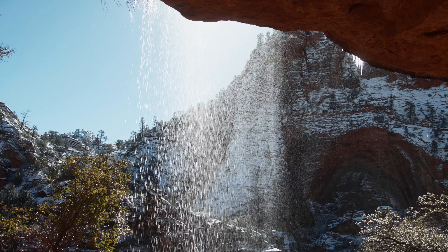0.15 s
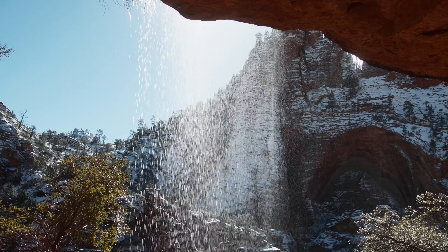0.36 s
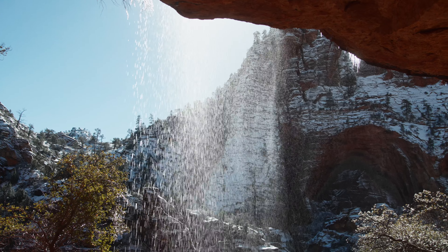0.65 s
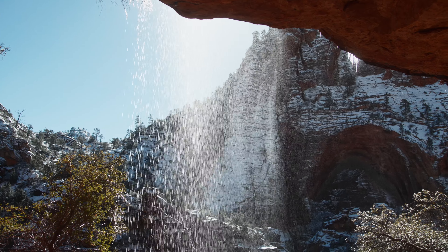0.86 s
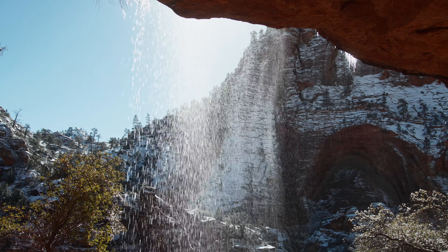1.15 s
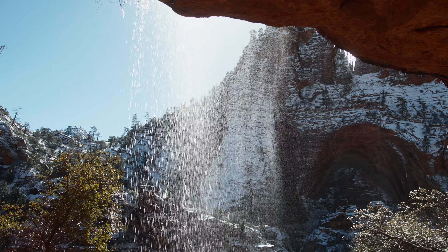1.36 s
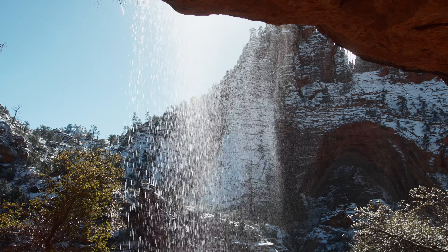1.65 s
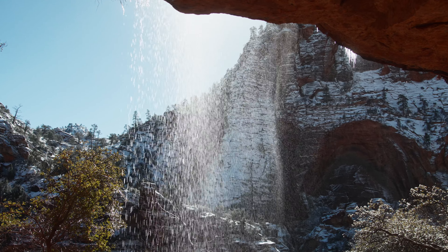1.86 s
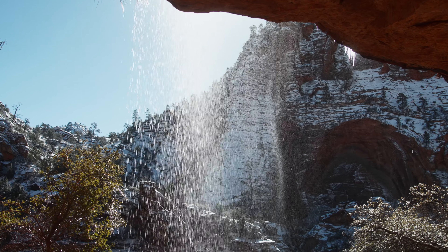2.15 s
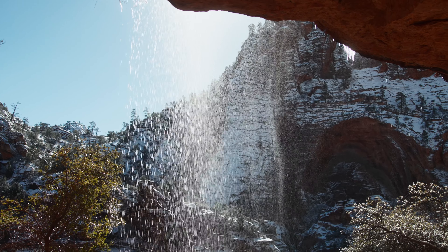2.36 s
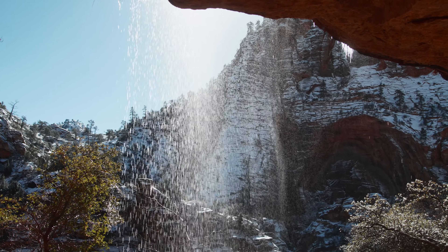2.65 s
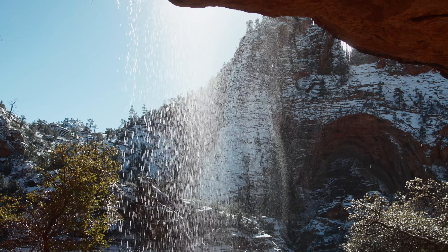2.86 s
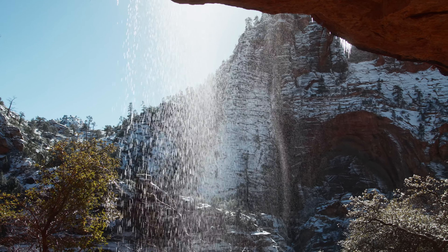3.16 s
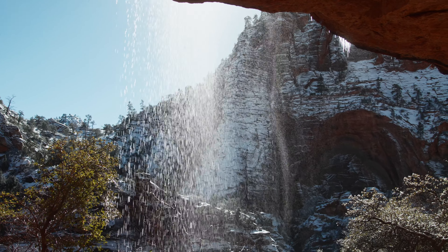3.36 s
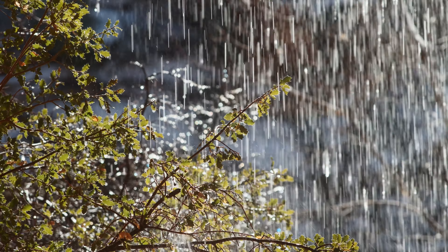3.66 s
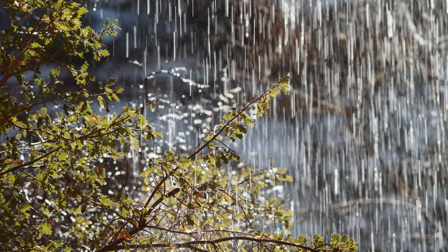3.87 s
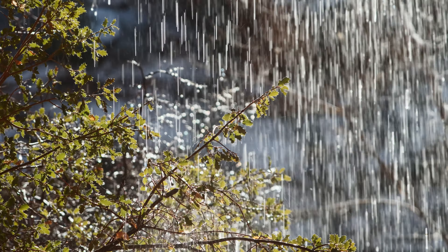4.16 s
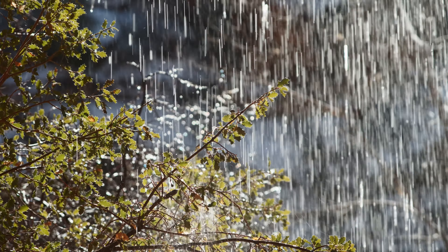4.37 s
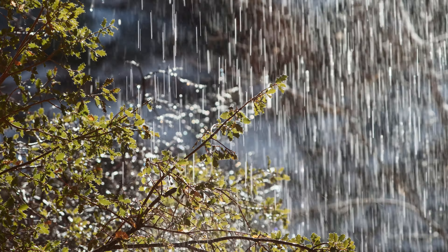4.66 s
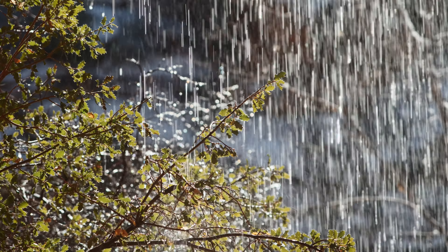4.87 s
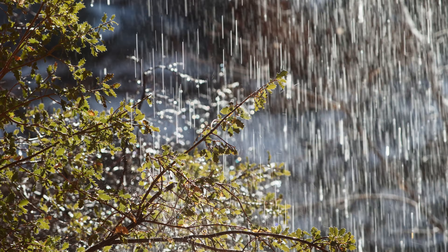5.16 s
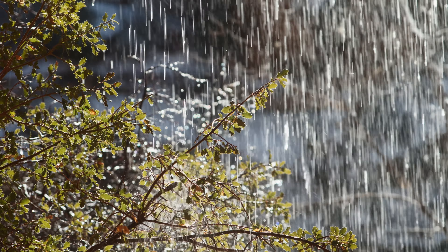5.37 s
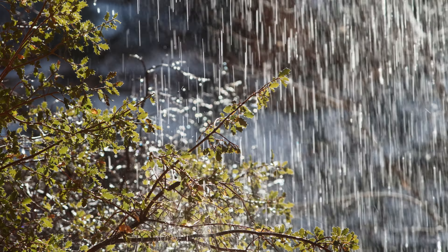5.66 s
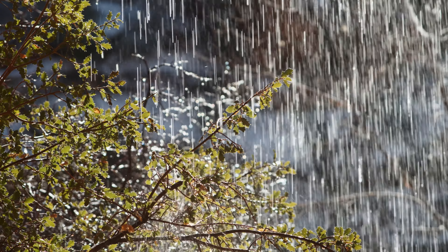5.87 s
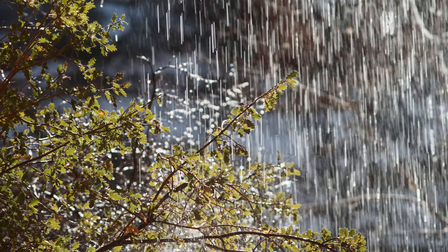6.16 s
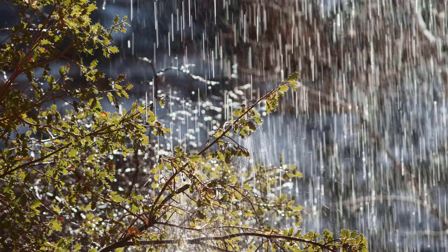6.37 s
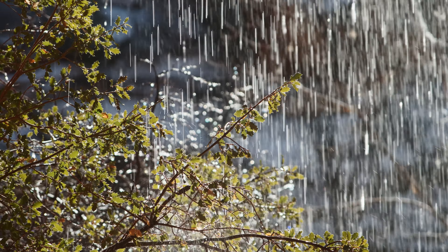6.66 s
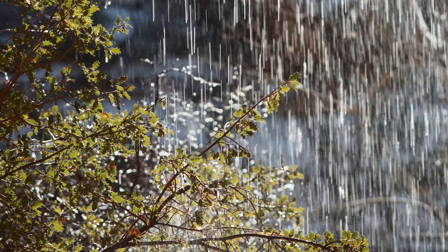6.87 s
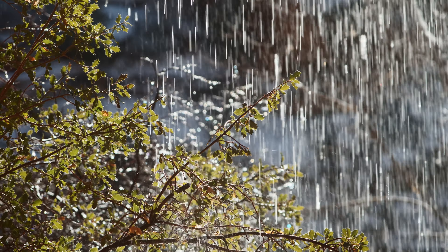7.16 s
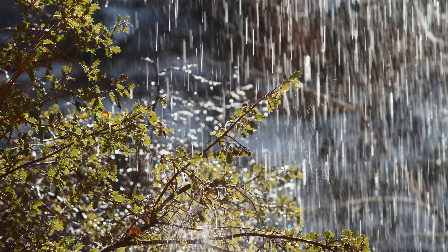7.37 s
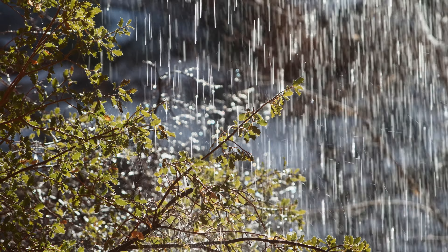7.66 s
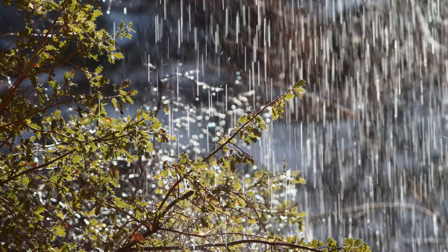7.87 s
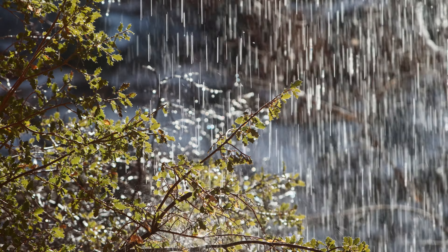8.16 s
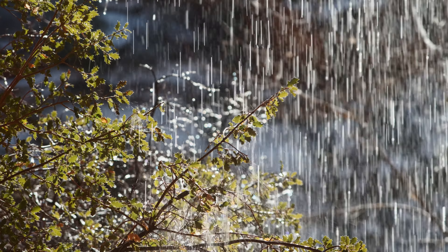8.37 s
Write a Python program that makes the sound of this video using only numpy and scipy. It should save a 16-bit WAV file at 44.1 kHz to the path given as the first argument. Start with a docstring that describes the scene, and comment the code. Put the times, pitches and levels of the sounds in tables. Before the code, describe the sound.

From 0 seconds, meltwater falls without pause from a rock overhang onto wet, stony ground, resembling heavy rain. A soft, even hiss from the water curtain lies behind dense small-drop patter and fine crackle, arriving in loose, random clumps. Individual larger drops stand out as short bright pops with a little spray, notably a strong pair near 1.1 and others around 2.4 and 2.9; tiny bubbles plop between them. At about 3.5 the sound switches abruptly closer and brighter, with low thumps and a brief wind bump, another bump near 3.8. Sharp snaps and ticks now pepper the splashing, with duller thuds around 4.5, 5.15 and 6.45. Drops cluster busily near 6.9-7.3 and 7.7-7.9, while the flow swells and slackens slightly. A short dull rock reflection and very faint low wind remain; the falling continues to the end at 8.5.

```python
"""Under a rock overhang: meltwater falls onto stony, wet ground close to a microphone.
Drops are a contact tick, a damped pop with a short ring, and lumpy noise for the spray.
Small drops patter and crackle in random clumps; trapped bubbles plop as rising, decaying sines.
Heavy lumps thump low; behind lie a sparse-tap rock echo, the curtain's shaped noise and low wind.
At about 3.5 s the sound turns closer and brighter: highs sharpen and the curtain thins near 7 kHz."""
import sys
import numpy as np
from scipy import signal
from scipy.fft import rfft, irfft, next_fast_len
from scipy.io import wavfile
from scipy.ndimage import uniform_filter1d

SR = 44100
rng = np.random.default_rng(int(sys.argv[2]) if len(sys.argv) > 2 else 0)


def digitize_waveform(pressure):
    """Quantize a signal to 16-bit integers and store it at the path in sys.argv[1].

    Rows of a 2-D input are taken as channels; values are limited to [-1, 1].
    """
    field = np.atleast_2d(pressure).T
    bounded = np.clip(field, -1, 1)
    quanta = np.round(bounded * 32767).astype(np.int16)
    wavfile.write(sys.argv[1], SR, quanta)


N = 375291

# loudest drops: [t/s, nominal pop peak/dB, pop f/Hz, relative tick setting/dB, relative spray setting/dB]
DROPS = [(0.0258, -16.5, 4840, -9, -12), (0.0302, -23, 1760, -9, -7), (0.0978, -19.5, 6350, -13, -14),
         (0.169, -17, 8700, -11, -19), (0.1865, -16.5, 4500, -18, -17), (0.2764, -17, 7000, -11, -23),
         (0.2865, -22, 6730, -6, -12), (0.5666, -14.5, 5600, -12, -20), (0.594, -28, 3900, -3, -17),
         (0.598, -33, 1400, -9, -3), (0.6143, -18, 4630, -12, -9), (0.6418, -19, 2230, 0.5, -5.5),
         (0.729, -18.5, 5130, -17, -24), (0.8256, -16, 7100, -29, -28), (0.8618, -18, 6670, -14, -14.5),
         (1.0174, -14.5, 7350, -20, -27), (1.056, -14.5, 7800, -8, -18), (1.118, -30, 3900, 2, -10),
         (1.1197, -11, 2420, -19, -14), (1.1238, -10.5, 2920, -19, -20), (1.2523, -17.5, 7060, -4, -26),
         (1.297, -17, 7250, -7, -21), (1.3256, -16.5, 6500, -17, -22), (1.3618, -22, 2840, -3, -12),
         (1.4973, -18, 3800, -17, -10), (1.511, -21.5, 4500, -15, -6), (1.6092, -26.5, 2300, -7, -3),
         (1.6103, -22.5, 4380, -13, -2), (1.741, -19, 7500, -7, -13), (1.7632, -24.5, 2880, 2, -7.5),
         (1.8143, -20.5, 8600, 2, -21), (1.9241, -18, 6760, -14, -20), (2.0932, -21, 6000, -5, -12),
         (2.196, -19, 4800, -9, -20), (2.2825, -24, 5430, 6, -7), (2.3567, -21.5, 5040, 3, -9),
         (2.396, -18, 5730, -17, -15), (2.4232, -12, 4200, -22, -15), (2.4261, -19.5, 4400, -16, -3),
         (2.4339, -19, 3700, -18, -22), (2.4947, -27, 4600, 1, -1), (2.5, -12.5, 3600, -7, -17),
         (2.5042, -22, 2190, 1.5, -9), (2.5324, -18, 6600, -13, -22), (2.7675, -16, 6600, -20, -22),
         (2.934, -23, 3100, -9, -3), (2.9371, -12.5, 2280, -8, -20), (2.9418, -14.5, 3070, -11, -12),
         (3.0007, -17.5, 4100, -11, -14), (3.0184, -14, 6100, -16, -25), (3.1134, -13, 9700, -11, -22),
         (3.121, -16, 6300, -17, -20), (3.2511, -12, 7240, -17, -23), (3.267, -13, 4540, -25, -16),
         (3.541, -16.5, 5400, -7, -25), (3.5987, -30, 2900, 8, 5), (3.5996, -12.5, 3080, -16, -23),
         (3.6171, -18.5, 9500, -1, -16), (3.6995, -26, 2300, -17, -18), (3.704, -19, 2330, -21, -29),
         (3.757, -12.5, 8300, -6.5, -22), (3.8063, -28.5, 3930, 6, -4), (3.8999, -30.5, 2800, 7, -14),
         (3.915, -17, 3220, -4, -9.5), (3.9194, -12, 3600, -11, -19), (3.923, -13, 3320, -6, -23),
         (3.9392, -11.5, 7100, -9, -27), (4.0192, -14.5, 1380, -17, -22), (4.058, -22, 8500, -8, -21),
         (4.0634, -21, 1730, -5, -15), (4.0786, -23, 8700, -6, -20), (4.161, -28, 6400, -13, -25),
         (4.272, -17.5, 2000, -1, -9), (4.3188, -17, 7360, -4, -19), (4.335, -21, 2370, -14, -10),
         (4.5283, -18.5, 2850, -3, -20), (4.8358, -19, 7800, -6, -23), (4.9143, -20.5, 4080, -1, -19),
         (4.9256, -29, 5600, 8, -15), (5.082, -22, 4540, 0, -21), (5.1177, -15.5, 10200, -6, -26),
         (5.1829, -18, 6660, -2, -17), (5.219, -25.5, 5000, 5, -10), (5.2881, -13, 3700, -3, -18),
         (5.298, -15.5, 5700, -6, -27), (5.5132, -21, 4130, -4, -11), (5.5245, -31, 2700, 6, -12),
         (5.5301, -11, 3230, -6, -12.5), (5.6062, -23, 1960, -11, -19), (5.6853, -21, 2200, -16, -12),
         (5.7335, -25, 2800, -13, -20), (5.8512, -24.5, 2600, 1.5, -14), (5.855, -14, 4700, -16, -21),
         (5.9337, -20.5, 910, -18, -26), (6.0457, -17.5, 4280, -3.5, -19), (6.217, -24, 2100, -3, -27),
         (6.316, -23.5, 5650, 6, -21), (6.3275, -16.5, 3100, -2.5, -15.5), (6.3386, -18.5, 1650, -1, -19),
         (6.377, -13, 4030, -14, -24), (6.4541, -20.5, 3500, -17, -14), (6.57, -18, 4400, -14, -13),
         (6.7972, -16.5, 9400, -3.5, -22), (6.8722, -17, 3400, -7, -14), (6.886, -14, 3220, -13, -30),
         (6.9092, -18, 4440, -4, -21), (6.951, -18.5, 5950, 0, -26), (6.981, -15, 3020, -3, -14),
         (6.9934, -22, 6500, 2, -24), (7.044, -21.5, 1980, -16, -9), (7.065, -20, 8150, -1, -17),
         (7.1153, -22, 4400, -2, -22), (7.1565, -23, 2600, -14, -12), (7.167, -19, 2760, -20, -16),
         (7.1946, -15.5, 6100, -5, -18), (7.2264, -15.5, 9600, -12, -27), (7.3243, -20, 2920, -5.5, -15),
         (7.526, -26, 4730, 0, -23), (7.713, -20, 2510, -11, -19), (7.7222, -22, 4030, -4, -16),
         (7.7342, -20, 4000, -4, -23), (7.7886, -20, 3580, -7, -11), (7.792, -12, 3100, -8, -19),
         (7.796, -25, 4800, 2, -17), (7.804, -22, 3100, -17, -23), (7.833, -19, 4400, 2, -17),
         (7.874, -20, 2530, -8, -15), (7.894, -20, 8100, -4, -25), (8.0465, -17.5, 4470, -14, -12),
         (8.1182, -20.5, 3630, -16, -22), (8.335, -22.5, 3440, -14, -26), (8.4273, -19.5, 3650, -4, -25)]
# swell and slackening of the falling water: [t/s, curtain hiss RMS level/dB]
FALL_LEVEL = [(0.0, -37.5), (1.47, -36.5), (2.72, -38), (3.2, -37.5), (3.72, -36.5), (4.34, -37),
              (6.35, -36.5), (6.75, -38.5), (7.06, -37), (7.35, -38), (7.89, -36), (8.25, -39), (8.51, -38)]
# quick turn to a closer, brighter sound: [t/s, nearness 0 far to 1 near]
NEARNESS = [(0, 0), (3.42, 0), (3.5, 1), (8.51, 1)]


def gain_of(db):
    """Amplitude ratio from dB."""
    return 10 ** (np.asarray(db) / 20)


def evened(x):
    """Scale to unit RMS."""
    return x / np.sqrt(np.mean(x ** 2) + 1e-20)


def smoothed_twice(x, size):
    """Two moving averages along the first axis, size in samples."""
    return uniform_filter1d(uniform_filter1d(x, size, axis=0), size, axis=0)


def along(rows, t_s):
    """Second column of a table, interpolated linearly in time."""
    rows = np.array(rows)
    return np.interp(t_s, rows[:, 0], rows[:, 1])


def read(points, hz):
    """Second column of a table, interpolated over log frequency."""
    f, value = np.transpose(points)
    return np.interp(np.log(hz + 1), np.log(f + 1), value)


def add(mix, start_s, sound):
    """Mix a sound in place, cut at the end of the mix."""
    part = mix[round(start_s * SR):][:len(sound)]
    part += sound[:len(part)]


def band(x, hz, spread):
    """First-order band-pass a factor `spread` either side of hz."""
    spread = max(spread, 1.05)
    edges_hz = [hz / spread, min(hz * spread, .49 * SR)]
    return signal.lfilter(*signal.butter(1, edges_hz, "band", fs=SR), x)


def pop(hz, turns, size):
    """A cavity opens and shuts: a sine whose envelope peaks at turns/2 cycles, high-passed to radiate no bass."""
    phase = hz * np.arange(size) / SR
    rise = phase / turns * 2
    swing = np.sin(2 * np.pi * phase) * rise * np.exp(1 - rise)
    return signal.lfilter(*signal.butter(2, hz / 4.45, "high", fs=SR), swing)


def tick(noise):
    """Contact: a wide, heavily damped swing plus fizz decaying over 1.6 ms."""
    t = np.arange(len(noise)) / SR
    fizz = evened(band(noise, 5800, 1.5)) * gain_of(-11.5) * np.exp(-t / 0.0016)
    return pop(5500, .4, size=len(t)) + fizz


def drop(hz, tick_db, spray_db, noise, spray_t60_s=0.039, spread=1.62):
    """A wide tick on contact, a pop with a short ring, then droplets falling back as lumpy noise."""
    t = np.arange(noise.shape[1]) / SR
    ring_env = np.exp(-t * hz / 4.3) * (1 - np.exp(-t * hz))  # decays over 4.3 cycles
    ring = gain_of(-15.0) * np.sin(2 * np.pi * hz * t) * ring_env
    lumps = gain_of(3 * evened(uniform_filter1d(noise[0], 40)))
    spray = evened(band(band(noise[1] * lumps, hz, spread), hz, spread))
    spray_env = gain_of(spray_db + 6.0 - 60 * t / spray_t60_s) * (1 - np.exp(-t / 0.0019)) ** 2
    contact = gain_of(tick_db + 7.5) * tick(noise[0])
    return pop(hz, 1.33, size=len(t)) + ring + contact + spray * spray_env


def big_drops():
    """Each near drop has its own size, pitch, tick and spray."""
    out, noise = np.zeros(N), rng.standard_normal((len(DROPS), 2, 2600))
    for (start_s, db, hz, tick_db, spray_db), row in zip(DROPS, noise):
        add(out, start_s, gain_of(db) * drop(hz, tick_db, spray_db, row))
    return out


def middling_drops():
    """Drops between the loudest and the patter land at random; nearness sharpens their tick."""
    count, mix_spread_db = 170, 3
    noise = rng.standard_normal((count, 2, 2600))
    times_s = rng.random(count) * N / SR
    chance = rng.standard_normal((count, 4)).clip(-2, 2)
    out = np.zeros(N)
    for start_s, (size, pitch, sharp, wet), row in zip(times_s, chance, noise):
        hz = min(5600 * 2 ** (.55 * pitch), 10000)  # spread in octaves
        tick_db = -9.5 + 5.5 * along(NEARNESS, start_s) + mix_spread_db * sharp
        spray_db = -17.5 + mix_spread_db * wet
        add(out, start_s, gain_of(-25.5 + 2.5 * size) * drop(hz, tick_db, spray_db, row))
    return out


def bubbles():
    """Drops into puddles trap bubbles: short sines that rise a little as they die, most at random."""
    # plops: [t/s, nominal peak level/dB, f/Hz]
    plops = [(2.688, -32, 2650), (2.723, -33, 1310), (5.604, -32, 1920), (5.696, -30, 2650),
             (5.732, -29, 2720), (5.851, -25, 2600), (6.215, -36, 2020)]
    fade_cycles, glide = 12.4, 0.054  # cycles to 1/e, and fractional pitch rise over them
    stray_count, stray_db, stray_hz, spread_octaves = 120, -39.5, 3090, 0.43
    times_s = rng.random(stray_count) * N / SR
    chance = rng.standard_normal((stray_count, 2)).clip(-2, 2)
    stray = [(start_s, stray_db + 3.0 * size, stray_hz * 2 ** (spread_octaves * pitch))
             for start_s, (size, pitch) in zip(times_s, chance)]
    out = np.zeros(N)
    for start_s, db, hz in [*plops, *stray]:
        turns = hz * np.arange(1500) / SR
        fade = turns / fade_cycles
        tone = np.sin(2 * np.pi * turns * (1 + glide * fade / 2))
        add(out, start_s, gain_of(db) * tone * np.exp(-fade) * (1 - np.exp(-turns)))
    return out


def clumped_hits(per_s, size_db, clump_db, clump_samples):
    """Random impacts in loose clumps, with random sign and a few larger: hit mask and amplitudes."""
    clumps = gain_of(clump_db * evened(smoothed_twice(rng.standard_normal(N), clump_samples)))
    hits = rng.random(N) < per_s / SR * clumps / clumps.mean()
    excess_db = size_db * np.minimum(rng.exponential(1, N), 3.0)
    return hits, hits * gain_of(excess_db) * rng.choice([-1, 1], N)


def patter(per_s=700, size_db=1.5, count=40):
    """Small drops of many pitches in clumps; those over 7 kHz gain level with nearness."""
    # small drops by pitch: [f/Hz, relative level/dB]
    pitch_levels = [(300, -21.5), (700, -6.5), (1500, -12.5), (3000, 11), (6000, 10.5), (10000, 17.5),
                    (15000, -25)]
    t = np.arange(N) / SR
    hits, size = clumped_hits(per_s, size_db, clump_db=4.5, clump_samples=700)
    kind, out, nearness = rng.integers(0, count, N), np.zeros(N), along(NEARNESS, t)
    for k, hz in enumerate(np.geomspace(pitch_levels[0][0], pitch_levels[-1][0], count)):
        shape = drop(hz, -9.0, -30.5, rng.standard_normal((2, 1200)))
        at = np.flatnonzero(hits & (kind == k))
        near_db = 2.0 * nearness[at] * max(np.log2(hz / 7000), 0)
        train = np.zeros(N)
        train[at] = size[at] * gain_of(read(pitch_levels, hz) + near_db)
        out += signal.oaconvolve(train, shape)[:N]
    return evened(out) * gain_of(along(FALL_LEVEL, t) - 5.5)


def crackle(per_s=250, size_db=5.5, count=12):
    """Fine droplets on stone and leaves only tick, in clumps; louder when near."""
    _, size = clumped_hits(per_s, size_db, clump_db=4.3, clump_samples=400)
    kind, t = rng.integers(0, count, N), np.arange(200) / SR
    out = np.zeros(N)
    for k, hz in enumerate(np.geomspace(5000, 15500, count)):
        shape = band(rng.standard_normal(200) * np.exp(-t / 0.0003), hz, 3.5)
        out += signal.oaconvolve(size * (kind == k), shape / np.linalg.norm(shape))[:N]
    return evened(out) * gain_of(-53.5 + 2.7 * along(NEARNESS, np.arange(N) / SR))


def snaps():
    """Sub-millisecond bursts at the very top: lone droplets, and the tick of every loud drop close by."""
    # sharpest lone droplets: [t/s, peak level/dB]
    lone = [(3.5311, -23), (3.9594, -26), (4.1162, -15), (4.4627, -37), (4.6488, -21), (5.055, -25),
            (5.1036, -26), (5.18, -26), (5.301, -26), (5.497, -27), (6.0898, -22), (6.288, -26),
            (6.608, -29), (6.8688, -28), (7.3073, -25), (7.3187, -17), (7.3735, -20), (7.5503, -21),
            (7.6027, -24), (7.927, -25), (7.995, -15)]
    snap_hz, decay_s, under_tick_db = 13400, 0.00077, -3
    close = [(start_s, db + tick_db + under_tick_db) for start_s, db, _, tick_db, _ in DROPS
             if along(NEARNESS, start_s) > .5]
    events, t = [*lone, *close], np.arange(200) / SR
    out, noise = np.zeros(N), rng.standard_normal((len(events), 200))
    for (start_s, db), row in zip(events, noise):
        burst = band(row * np.exp(-t / decay_s), snap_hz, 1.5)
        add(out, start_s, gain_of(db) * burst / abs(burst).max())
    return out


def thumps():
    """A heavy lump makes a low pop and a short rumble in the ground."""
    # dull thumps: [t/s, nominal pop peak/dB, f/Hz, rumble t60/s]
    lumps = [(3.486, -24.5, 230, 0.1), (3.487, -19.5, 547, 0.042), (3.519, -30, 220, .06),
             (3.557, -32, 282, .04), (3.568, -30.5, 245, 0.057), (3.816, -31, 204, 0.09),
             (3.84, -41, 149, 0.3), (3.875, -37, 262, 0.45), (4.468, -30.5, 280, 0.18),
             (4.498, -40, 238, .04), (5.134, -30, 357, .04), (5.158, -30, 420, 0.075),
             (5.162, -36, 172, 0.053), (6.457, -26, 390, 0.042), (6.481, -32, 221, 0.077)]
    out, t = np.zeros(N), np.arange(8000) / SR
    noise = rng.standard_normal((len(lumps), 8000))
    for (start_s, db, hz, t60_s), row in zip(lumps, noise):
        rumble = evened(band(band(row, hz, 1.5), hz, 1.5))
        rumble = rumble * gain_of(-7.0 - 60 * t / t60_s) * (1 - np.exp(-t * hz))
        add(out, start_s, gain_of(db) * (pop(hz, 1.04, size=len(t)) + rumble))
    return out


def overhang(x, t60_s=0.23):
    """The rock roof returns a short dull scatter: sparse decaying taps from 4 ms, low-passed."""
    t = np.arange(5000) / SR
    sparse = (rng.random(5000) < .3) * (t > .004)
    taps = rng.choice([-1., 1.], 5000) * sparse * gain_of(-60 * t / t60_s)
    taps = signal.lfilter(*signal.butter(1, 6000, fs=SR), taps)
    return signal.oaconvolve(x, taps / np.linalg.norm(taps))[:N]


def hiss():
    """The far curtain: random spectra with patches and a flicker shared over wide bands."""
    # curtain spectrum: [f/Hz, relative level/dB]
    spectrum = [(40, -64), (100, -14), (160, -9.5), (235, -0.5), (330, -0.5), (560, -2.5), (1000, -1),
                (1800, -1.5), (2800, 0.5), (6000, 1.5), (8200, 0), (12400, -8), (16000, -10)]
    frames, hz = N // 128 + 5, np.fft.rfftfreq(512, 1 / SR)
    real, imag, patches, flicker = rng.standard_normal((frames, 257, 4)).T  # each (frequency, frame)
    patches = evened(uniform_filter1d(uniform_filter1d(patches, 8, 0), 12, 1))
    flicker = evened(uniform_filter1d(uniform_filter1d(flicker, 90, 0), 4, 1))
    nearness = along(NEARNESS, np.arange(frames) * 128 / SR)
    octaves = np.log2((hz + 1) / 7000)[:, None]
    # close up: brighter above 7 kHz, thinner around it
    near_db = (0.44 * np.maximum(octaves, 0) - 2.5 * np.exp(-octaves ** 2 / 1.1)) * nearness
    z = (real + 1j * imag) * gain_of(1.73 * patches + 1.34 * flicker + near_db)
    x = signal.istft(z, nperseg=512, noverlap=384)[1][:N]
    size = next_fast_len(N)
    shape = gain_of(read(spectrum, np.fft.rfftfreq(size, 1 / SR)))
    x = irfft(rfft(x, size) * shape, size)[:N]
    return evened(x) * gain_of(along(FALL_LEVEL, np.arange(N) / SR))


def wind():
    """A lumpy low rumble on the microphone: a wavering breeze and gusts that strike and die away."""
    # gusts: [start t/s, level before rise and decay/dB, decay/s]
    gust_rows = [(3.5, -44, .05), (3.812, -43, 0.081)]
    breeze_db, near_db, waver_db, gust_rise_s = -72, -2.5, 2.5, .008
    t = np.arange(N) / SR
    sos = signal.butter(2, [24, 85], "band", fs=SR, output="sos")
    low = signal.sosfilt(sos, rng.standard_normal(N))
    waver = evened(smoothed_twice(rng.standard_normal(N), 9000))
    level = gain_of(breeze_db + near_db * along(NEARNESS, t) + waver_db * waver)
    for start_s, db, decay_s in gust_rows:
        since = np.maximum(t - start_s, 0)
        level = level + gain_of(db) * (1 - np.exp(-since / gust_rise_s)) * np.exp(-since / decay_s)
    return evened(low) * level


def scene():
    """Near impacts with their rock echo, over the curtain and the wind."""
    near = big_drops() + middling_drops() + bubbles() + patter() + crackle() + snaps() + thumps()
    return (near + gain_of(-13.0) * overhang(near) + hiss() + wind())[None]


def record(dry):
    """Band limit: linear-phase low-pass at 15.7 kHz."""
    taps = signal.firwin(511, 15700, window=("kaiser", 9), fs=SR)
    return signal.oaconvolve(dry, taps[None], "same")


dry = scene()
out = record(dry)
digitize_waveform(out)
```